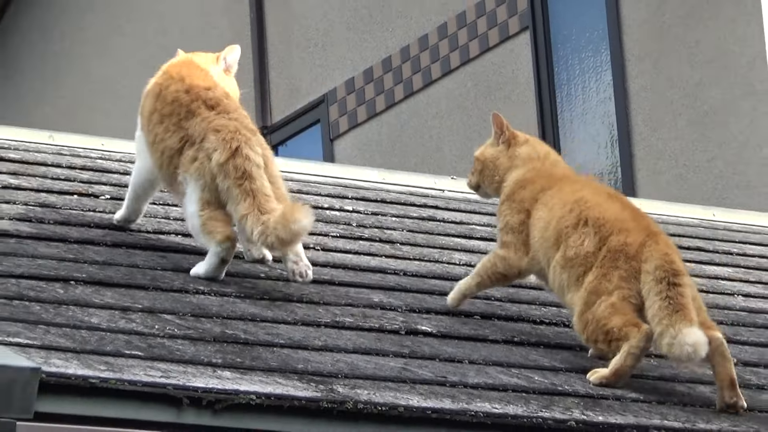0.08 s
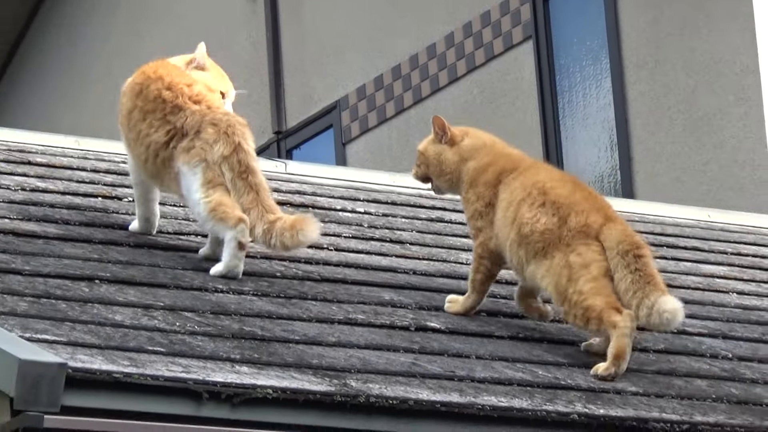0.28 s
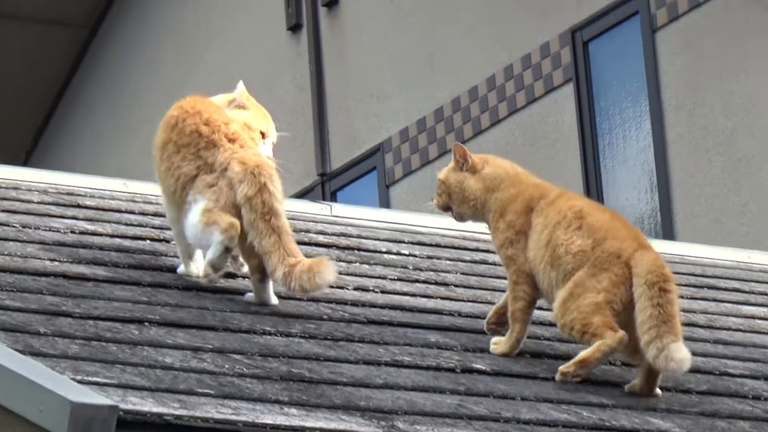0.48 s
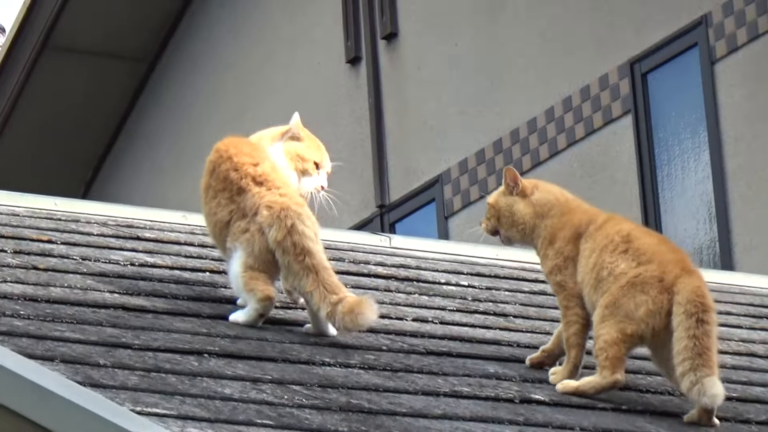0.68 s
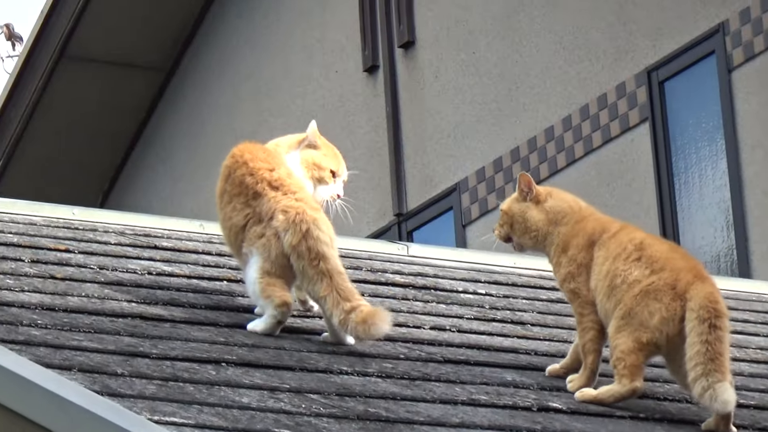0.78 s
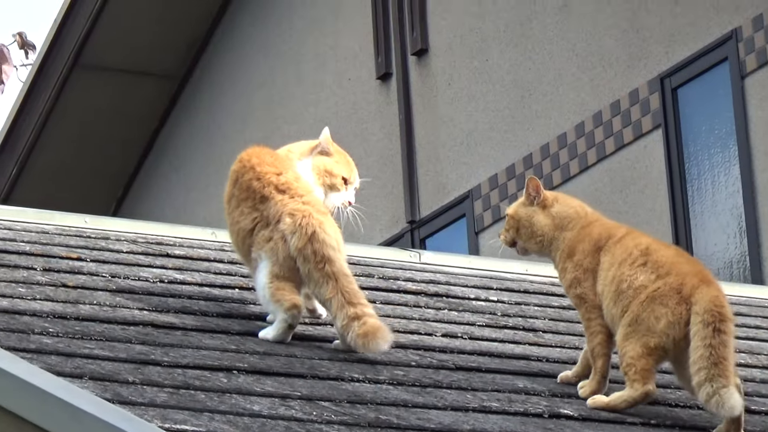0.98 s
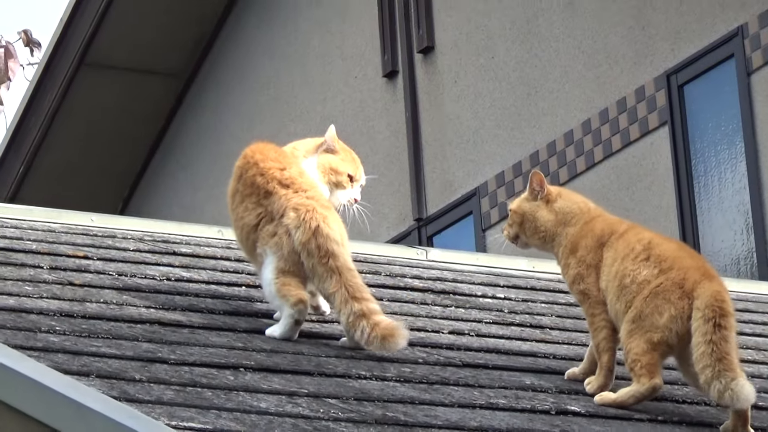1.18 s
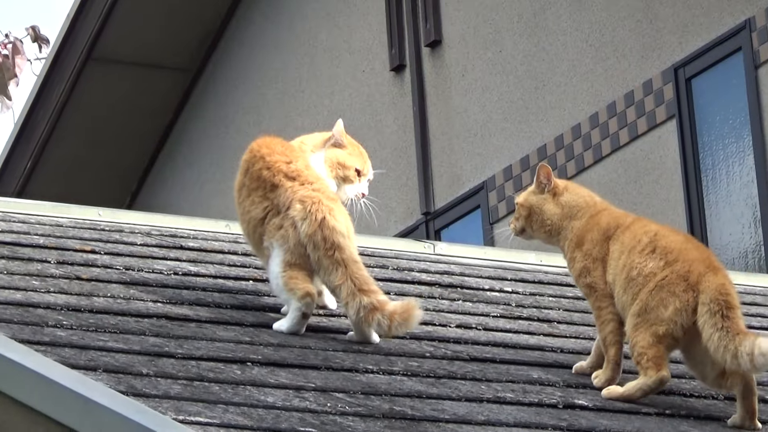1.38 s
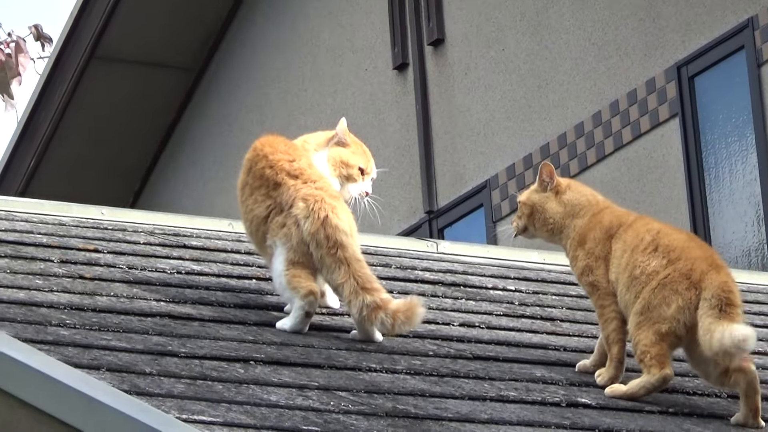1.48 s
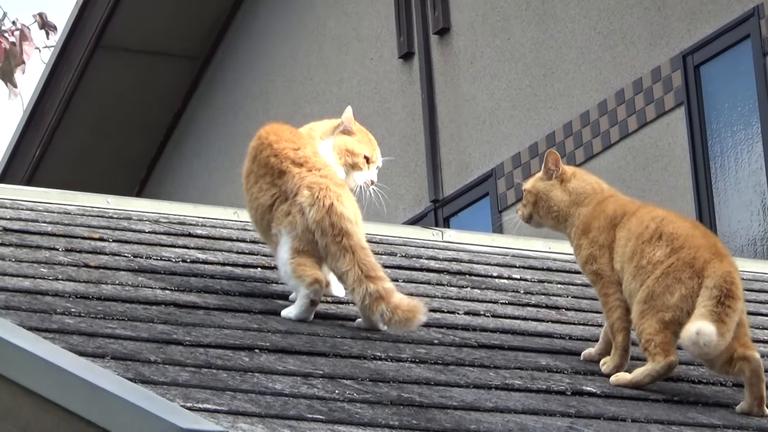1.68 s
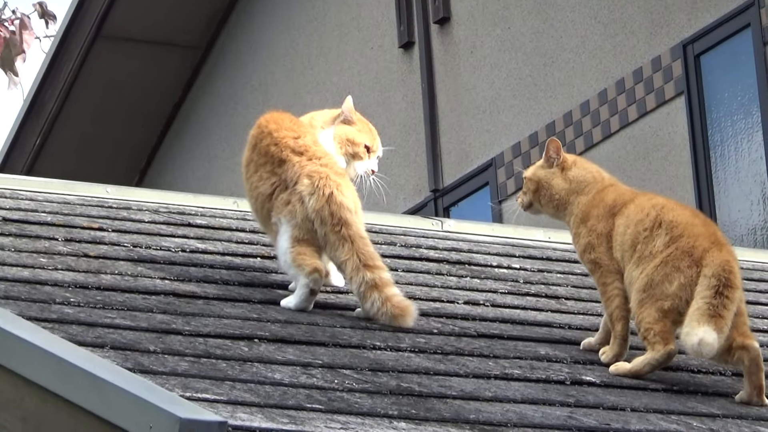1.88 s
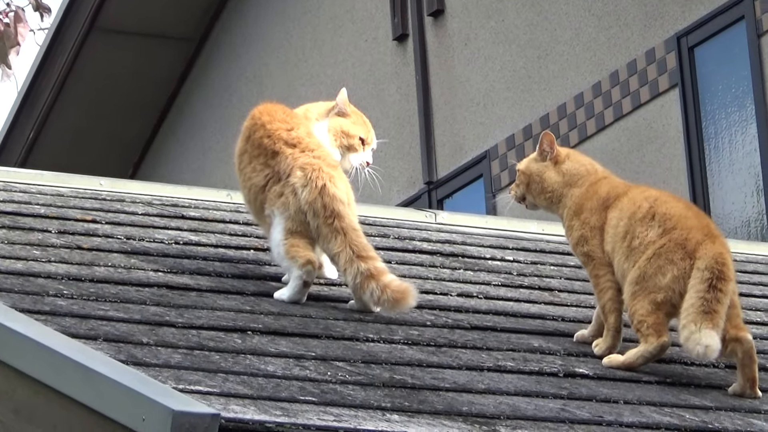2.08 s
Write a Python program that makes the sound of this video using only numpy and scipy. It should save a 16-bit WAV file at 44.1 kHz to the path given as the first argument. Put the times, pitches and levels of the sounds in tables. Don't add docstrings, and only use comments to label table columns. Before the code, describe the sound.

Single piercing cat yowl on a roof, starting just after a short claw scrape and cut off after about a second, then a quiet pulsing growl, soft leaf rustle and distant town rumble, with house walls echoing.

```python
import sys
import numpy as np
from scipy import signal
from scipy.fft import rfft, irfft
from scipy.io import wavfile
from scipy.ndimage import uniform_filter1d

SR = 44100
rng = np.random.default_rng(int(sys.argv[2]) if len(sys.argv) > 2 else 0)


def generate_wav(signal):
    frames = np.transpose(np.atleast_2d(signal))
    scaled = np.clip(frames, -1, 1) * 32767
    pcm = np.round(scaled).astype(np.int16)
    wavfile.write(sys.argv[1], SR, pcm)


def magnitude_from_level(level_db):
    exponent = np.asarray(level_db, float) / 20
    return 10 ** exponent


N = 92610
T = np.arange(N) / SR
HZ = np.arange(N // 2 + 1) * SR / N


def curve(table, k, smooth_s=0.043):
    rows = np.array(table, float)
    return uniform_filter1d(np.interp(T, rows[:, 0], rows[:, k]), int(smooth_s * SR) + 1, mode="nearest")


def gate(table, edge_samples):
    on = (T > table[0][0]) & (T < table[-1][0])
    return uniform_filter1d(1. * on, edge_samples)


def colour(points, hz):
    rows = np.array(points, float)
    return np.interp(np.log(np.maximum(hz, 1)), np.log(rows[:, 0]), rows[:, 1])


def unit(x):
    return x / np.sqrt(np.mean(x ** 2))


def bump(hz, centre_hz, width_hz):
    return 1 / (1 + (2 * (hz - centre_hz) / width_hz) ** 2)


def ring(x, peaks):
    return sum(magnitude_from_level(db) * signal.lfilter(*signal.iirpeak(hz, hz / width, fs=SR), x) for hz, width, db in peaks)


def walk(rate_hz):
    k = int(SR / rate_hz)
    steps = np.repeat(rng.standard_normal(N // k + 1), k)
    return unit(uniform_filter1d(uniform_filter1d(steps, k), k)[:N])


def tinted(points, *more):
    db = colour(points, HZ) + sum(colour(m, HZ) for m in more)
    return irfft(rfft(rng.standard_normal(N)) * magnitude_from_level(db), N)


def pan(db):
    return magnitude_from_level(np.array([[db], [-db]]) / 2)


# start_s, level_db, mouth_hz, throat_ratio (resonances relative to rest)
YOWL = [
    (.172, -45, 1490, 0.31),
    (.196, -37.5, 1940, 0.72),
    (.225, -26, 1753, 0.84),
    (.35, -21, 2083, 0.89),
    (.6, -22.5, 1887, 0.912),
    (.8, -23, 1723, 0.98),
    (1.05, -26, 1490, .9),
    (1.28, -29, 1240, 0.96),
    (1.315, -45.5, 1110, 0.54),
]
# start_s, pitch_hz
PITCH = [
    (.39, 789),
    (.43, 775.8),
    (.55, 780.9),
    (.69, 768.2),
    (.82, 735.6),
    (.96, 703.2),
    (1.1, 686),
    (1.2, 657.2),
    (1.295, 583.8),
]
# freq_hz, level_db
THROAT = [(400, -32.5), (780, -9.5), (3150, -8), (3850, -29.5), (4650, -20), (9000, -27.5), (12000, -31),
          (14500, -34.5)]
# freq_hz, level_db_per_hz
BREATH = [(400, -36), (1500, -9.5), (1950, 2), (2400, -8), (4000, -14), (7600, -12.5), (14000, -26.5)]


def yowl():
    swoop_start_s, swoop_depth_hz, swoop_tau_s, swoop_shape = .17, 473.4, .063, 1.2
    jitter, shimmer_db, patchy_db, odd_db = 0.00191, 2.5, 3, -7.5
    mouth_db, mouth_width_hz = 18.5, 577
    palate_hz, palate_width_hz, palate_db = 2814, 142, 3.5
    teeth_hz, teeth_width_hz, teeth_db = 7600, 1500, 27
    opening_s, closed_db_per_oct = .13, -14.5
    top_hz, above_top_db_per_oct = 12600, -90
    breath_db, opening_breath_db = -29, 8

    since = np.maximum(T - swoop_start_s, 0)
    swoop = swoop_depth_hz * np.exp(-(since / swoop_tau_s) ** swoop_shape)
    pitch_hz = (curve(PITCH, 1, smooth_s=0.013) - swoop) * (1 + jitter * walk(40.43))
    phase = 2 * np.pi * np.cumsum(pitch_hz) / SR
    mouth_hz, throat = curve(YOWL, 2), curve(YOWL, 3)
    closed = np.exp(-(since / opening_s) ** 2)
    voice = 0
    for k in range(1, 32):
        hz = k * pitch_hz
        db = colour(THROAT, hz / throat) + mouth_db * bump(hz, mouth_hz, mouth_width_hz)
        db = db + teeth_db * closed * bump(hz, teeth_hz, teeth_width_hz)
        db = db + palate_db * bump(hz, palate_hz, palate_width_hz)
        db = db + closed_db_per_oct * closed * np.log2(np.maximum(hz / mouth_hz, 1))
        db = db + odd_db * (k % 2) * (k > 3)
        db = db + above_top_db_per_oct * np.log2(np.maximum(hz / top_hz, 1))
        db = db + shimmer_db * (1 + 2 * closed * (k > 7)) * walk(24.94)
        db = db + patchy_db * (k > 6) * walk(6.12)
        voice = voice + magnitude_from_level(db) * (hz < .4 * SR) * np.sin(k * phase + k * k)
    breath = magnitude_from_level(breath_db + opening_breath_db * closed) * unit(tinted(BREATH)) * (1 + np.cos(phase))
    return (voice + breath) * magnitude_from_level(curve(YOWL, 1, smooth_s=0.03)) * gate(YOWL, 200)


# start_s, pitch_hz, level_db
NOTE = [
    (.155, 860, -60),
    (.198, 878, -43),
    (.232, 884, -28),
    (.255, 886, -31),
    (.275, 880, -46),
    (.3, 875, -62),
]


def note():
    waver, shimmer_db = .012, 3
    hoarse_db, hoarse_t60_s, hoarse_width_hz, hoarse_rise_s = -30, 0.85, 89, 0.065
    pitch_hz = curve(NOTE, 1) * (1 + waver * walk(55))
    level_db = curve(NOTE, 2, smooth_s=0.0033) + 8.5 + shimmer_db * walk(60.5)
    hum = gate(NOTE, 400) * magnitude_from_level(level_db) * np.sin(2 * np.pi * np.cumsum(pitch_hz) / SR)

    peak_s, peak_hz, _ = NOTE[2]
    since = T - peak_s
    fade = magnitude_from_level(hoarse_db - 60 * np.maximum(since, 0) / hoarse_t60_s) * np.clip(1 + since / hoarse_rise_s, 0, 1)
    band = [(peak_hz, hoarse_width_hz, 0)]
    wheeze = unit(ring(ring(rng.standard_normal(N), band), band))
    return hum + fade * wheeze


# start_s, level_db, jaws_db
GROWL = [
    (0, -62.5, -16),
    (.9, -58, -32),
    (1.2, -53.5, -3),
    (1.55, -48.5, -7.5),
    (1.75, -55, 3.5),
    (1.95, -53.5, -4),
    (2.1, -61, 3),
]
# centre_hz, width_hz, level_db
CHEST = [(162, 40, -2), (230, 50, 0)]
# centre_hz, width_hz, level_db
JAWS = [(650, 300, 15), (1028, 374, 17.5), (1400, 110, 6)]


def growl():
    pulse_hz, scatter_db, air_gain = 51.85, 6.5, 0.16
    phase = np.cumsum(pulse_hz * (1 + .25 * walk(30))) / SR
    pulses = np.diff(np.floor(phase), prepend=0) * magnitude_from_level(scatter_db * walk(60))
    air = air_gain * np.exp(-(phase % 1) / 0.78) * rng.standard_normal(N)
    source = pulses + air
    chest = unit(ring(ring(source, CHEST), CHEST))
    jaws = unit(ring(ring(source, JAWS), JAWS))
    return magnitude_from_level(curve(GROWL, 1)) * (chest + magnitude_from_level(curve(GROWL, 2)) * jaws)


# start_s, level_db, length_s
SCRATCH = [
    (0.033, -31.5, 0.0068),
    (0.174, -43, 0.0092),
]
# centre_hz, width_hz, level_db
TILE = [(2560, 1140, -12.5), (3400, 220, -6), (4800, 1600, -45)]


def claws():
    env = 0
    for start_s, level_db, length_s in SCRATCH:
        since = np.maximum(T - start_s, 0)
        env = env + magnitude_from_level(level_db) * (T > start_s) * np.exp(-(since / length_s) ** 2)
    return ring(env * 3 * rng.standard_normal(N), TILE)


# delay_s, level_db, pan_db (left minus right)
ECHOES = [
    (.011, -30, -5.5),
    (.032, -12, -2),
    (.052, -29.5, -9.5),
    (0.063, -15, -6),
    (.073, -16.5, 11),
    (.123, -21.5, 1),
    (0.134, -24.5, -2),
]
# freq_hz, level_db
WALLS = [(150, -6), (580, 9), (880, -4), (1250, -3), (1800, -3), (2450, 3), (4000, -6), (10000, -16)]


def yard(x):
    tail_db, t60_s, side_db = -7.5, 0.43, -3.5
    t = T[:SR]
    mid, side = (unit(h * magnitude_from_level(-60 * t / t60_s)) * magnitude_from_level(tail_db) for h in rng.standard_normal((2, SR)))
    reply = mid + magnitude_from_level(side_db) * side * np.array([[1], [-1]])
    for delay_s, level_db, pan_db in ECHOES:
        reply = reply + np.sqrt(SR) * np.sinc((t - delay_s) * SR) * pan(pan_db) * magnitude_from_level(level_db)
    x = irfft(rfft(x) * magnitude_from_level(colour(WALLS, HZ)), N)
    return np.array([signal.fftconvolve(x, h / np.sqrt(SR))[:N] for h in reply])


# start_s, level_db
BREEZE = [
    (0, -61),
    (1.2, -54),
    (1.4, -54),
    (1.55, -56.5),
    (1.9, -55),
    (2.1, -58.5),
]
# freq_hz, level_db_per_hz
LEAVES = [(500, -29), (1200, 21), (3000, 11.5), (6000, 8), (9000, 12), (13000, 3)]


def breeze():
    return unit(tinted(LEAVES)) * magnitude_from_level(curve(BREEZE, 1) + 1.0 * walk(9.4))


# freq_hz, level_db_per_hz
TOWN = [(15, -45), (25, -6.5), (212, -2), (309, -5.5), (818, -11), (1130, -9.5), (1290, -17), (1520, -18),
        (16000, -32)]
# freq_hz, side_minus_mid_db
TOWN_SIDE = [(60, -33), (110, -59), (200, -35), (380, -10), (700, -11), (1290, -0.5), (2380, -2),
             (4400, -2), (8120, 0.5), (15000, -17)]


def town():
    level_db = -52.5
    mid, side = tinted(TOWN), tinted(TOWN, TOWN_SIDE)
    gain = magnitude_from_level(level_db + 1 * walk(3.23)) / np.sqrt(np.mean(mid ** 2))
    return gain * (mid + side * np.array([[1], [-1]]))


def scene():
    call, hum, rest = yowl(), note(), growl() + claws()
    direct = call * pan(0.4) + hum * pan(-4.5) + rest
    return direct + yard(call + hum + rest) + breeze() + town()


def band_limit(x):
    return signal.sosfilt(signal.butter(12, 16480, fs=SR, output="sos"), x)


def record(dry):
    mic_top_hz, side_low_hz, side_top_hz, top_hz = 12000, 208, 10000, 15780
    mid, side = (dry[0] + dry[1]) / 2, (dry[0] - dry[1]) / 2
    side = signal.lfilter(*signal.butter(1, side_low_hz, "high", fs=SR), side)
    side = signal.lfilter(*signal.butter(4, side_top_hz, fs=SR), side)
    mix = signal.lfilter(*signal.butter(2, mic_top_hz, fs=SR), np.array([mid + side, mid - side]))
    mix = signal.sosfilt(signal.ellip(8, .2, 60, top_hz, fs=SR, output="sos"), mix)
    return band_limit(mix)


dry = scene()
out = record(dry)
generate_wav(out)
```